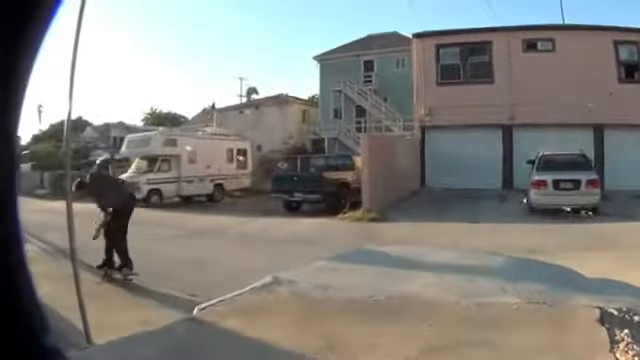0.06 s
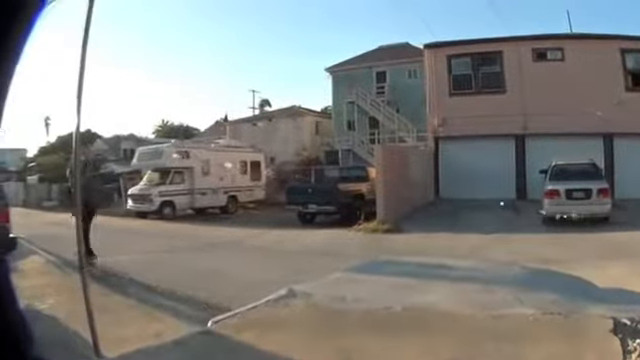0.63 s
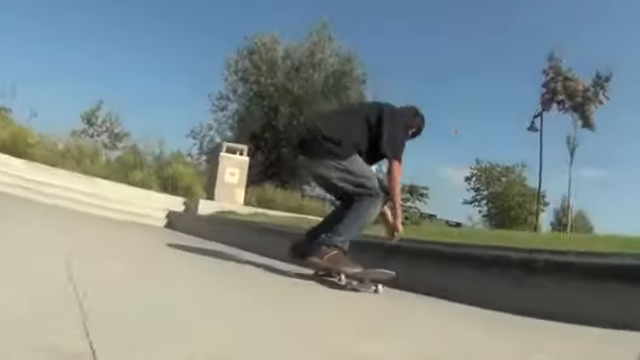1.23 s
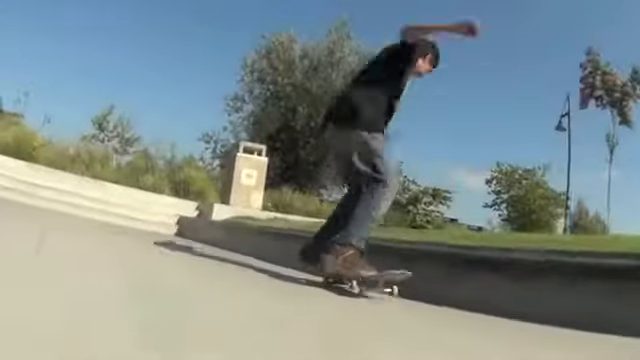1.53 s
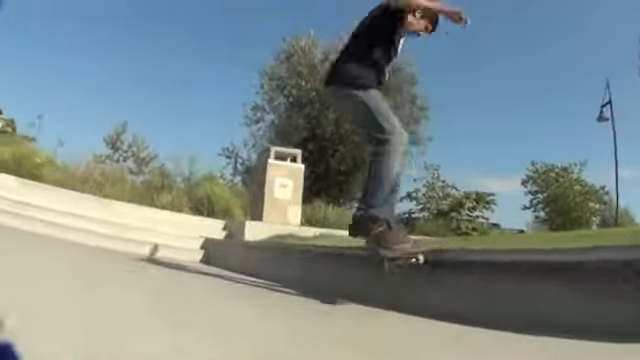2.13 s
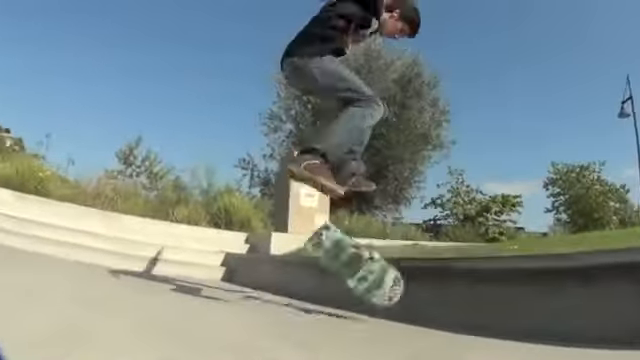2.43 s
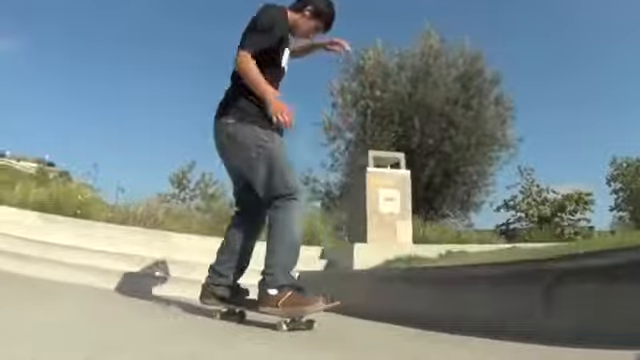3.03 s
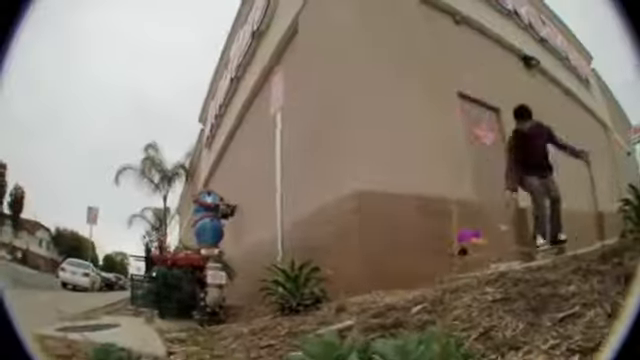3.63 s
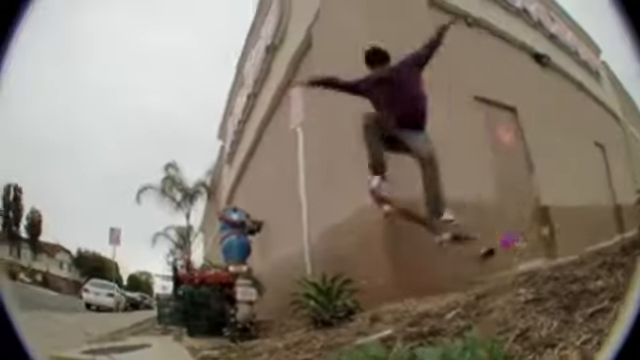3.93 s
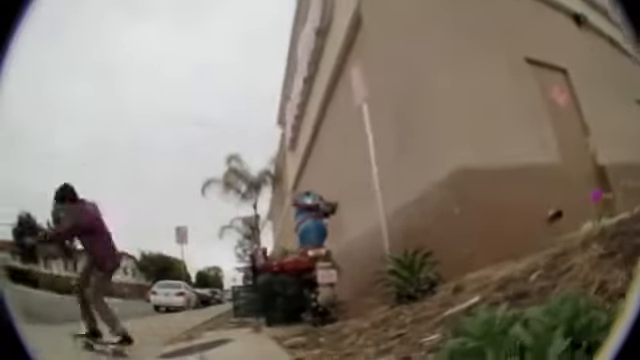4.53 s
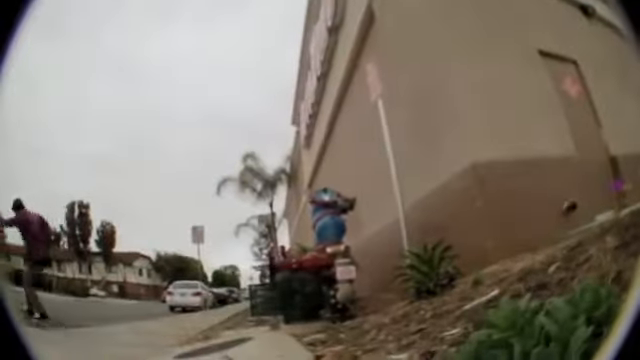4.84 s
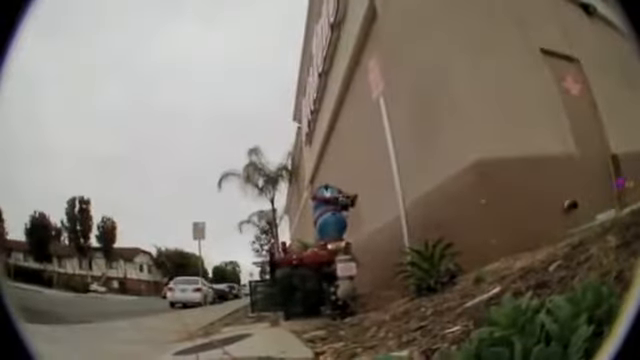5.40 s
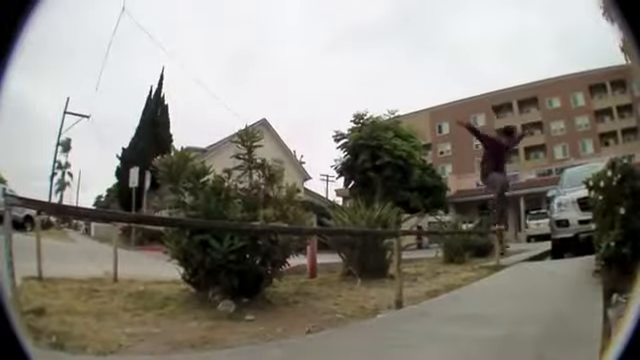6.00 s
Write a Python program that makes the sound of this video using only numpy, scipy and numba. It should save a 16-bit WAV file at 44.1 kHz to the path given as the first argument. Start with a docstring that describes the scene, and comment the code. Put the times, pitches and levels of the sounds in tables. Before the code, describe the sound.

A skateboard rolls over concrete outdoors, with sharp pops and clattering landings, then quieter rolling and single clacks over faint traffic.

```python
"""A skateboard rolls on concrete in four scenes: a push down an alley, a close ledge trick through a
limiter, an ollie over a gap beside a street, and one distant pop. Grains of the concrete drive wheels
and deck into random forced vibration; pops, landings and joints are impacts that excite the damped
modes of the maple deck. Friction makes the wheels sing, walls scatter a short reverberation,
gusts buffet the microphone and far traffic adds a steady wash."""
import sys
import numpy as np
from scipy import signal
from scipy.fft import rfft, irfft, next_fast_len
from scipy.io import wavfile
from scipy.ndimage import uniform_filter1d
from numba import njit

SR = 44100
rng = np.random.default_rng(int(sys.argv[2]) if len(sys.argv) > 2 else 0)


def generate_wav(sig):
    """Save sig (samples, or channels by samples) to the path in sys.argv[1] as 16-bit PCM at SR."""
    pcm = np.round(np.clip(np.atleast_2d(sig).T, -1, 1) * 32767).astype(np.int16)
    wavfile.write(sys.argv[1], SR, pcm)


N = 276066
T = np.arange(N) / SR
ALLEY_S, LEDGE_S, GAP_S, FAR_S = (-.2, .957), (.963, 3.497), (3.497, 5.722), (5.728, 6.5)  # start, end


def undb(db):
    """Decibels to amplitude ratio."""
    return 10 ** (np.asarray(db) / 20)


def unit(x):
    """Normalise to rms 1."""
    return x / np.sqrt(np.mean(x ** 2) + 1e-18)


def peak(x):
    """Normalise the crest of the envelope to about 1."""
    return x / np.sqrt(2 * uniform_filter1d(x ** 2, size=64).max())


def burst(x):
    """Normalise to the energy of 20 ms at rms 1."""
    return x / np.sqrt(np.sum(x ** 2) / (SR / 50))


def shape(x, gain):
    """Linear filtering: multiply the spectrum by gain(hz)."""
    size = next_fast_len(x.shape[-1])
    hz = np.maximum(np.arange(size // 2 + 1) * SR / size, 1)
    return irfft(rfft(x, size) * gain(hz), size)[..., :x.shape[-1]]


def colour(x, points):
    """Filter by (Hz, dB) points joined on a log axis."""
    f, db = np.transpose(points)
    return shape(x, lambda hz: undb(np.interp(np.log(hz), np.log(f), db)))


def resonance(hz, centre_hz, width_hz):
    """A Lorentzian peak of height 1."""
    return 1 / (1 + (2 * (hz - centre_hz) / width_hz) ** 2)


def walk(rate, size):
    """Random modulation with a spread near 1 and `rate` new values a second."""
    knots = rng.standard_normal(int(size / SR * rate) + 2)
    return np.interp(np.arange(size) / SR * rate, np.arange(len(knots)), knots)


def ramp(start_s, length_s):
    """Linear rise from 0 to 1."""
    return np.clip((T - start_s) / length_s, 0, 1)


def window(span, fade_in=.1, fade_out=.1):
    """Linear fades at both ends of a time span."""
    return ramp(span[0], fade_in) * np.clip((span[1] - T) / fade_out, 0, 1)


def bump(middle_s, half_s):
    """Gaussian swell to 1 and back."""
    return np.exp(-((T - middle_s) / half_s) ** 2)


def spread(mid, side, side_db):
    """Mid-side stereo: the sum goes left, the difference right."""
    return mid + undb(side_db) * side * np.array([[1], [-1]])


# Rough patches. Each row: middle in seconds, half length in seconds, rise of the grit in dB.
ROUGHNESS = [(0.037, 0.06, 5.5), (0.202, 0.012, 4.5), (.57, 0.021, 5), (0.736, 0.009, 8),
             (0.843, 0.045, 10), (1.124, .04, 2), (1.33, 0.036, 2), (2.95, 0.023, 4.5), (3.067, 0.069, 3.5),
             (3.213, 0.1, 4.5), (3.905, 0.022, 13)]
# The rider's shifting weight. Each row: middle in seconds, half length in seconds, rumble change in dB.
WHEEL_LOADS = [(0.558, 0.073, 4.5), (1.765, 0.037, -9), (2.349, 0.028, 6), (2.516, 0.046, -7),
               (3.11, 0.017, 5.5), (3.353, 0.011, 8.5), (3.582, .012, 14), (4.573, 0.055, 14),
               (5.17, 0.098, 10)]


def drive(base_db, change_db, rumble_slope, grit_slope):
    """Excitation in dB: load adds rumble; roughness adds grit, and about half as much roar."""
    rough = sum(db * bump(s, half_s) for s, half_s, db in ROUGHNESS)
    load = sum(db * bump(s, half_s) for s, half_s, db in WHEEL_LOADS)
    roar = base_db + change_db + 0.49 * rough
    rumble = base_db + rumble_slope * change_db + load
    grit = base_db + grit_slope * change_db + rough
    return roar, rumble, grit


def patchy(x, depth_db, rate, count=24):
    """Amplitude modulation: each band swells and fades by itself as the wheels meet new ground."""
    centres = np.linspace(np.log(100), np.log(16000), count)
    bands = (shape(x, lambda hz: np.interp(np.log(hz), centres, weight)) for weight in np.eye(count))
    return sum(band * undb(depth_db * walk(rate, x.shape[-1])) for band in bands)


def rolling(span, levels, tone, board, ring, grain_db, flutter_db, side_db):
    """Forced vibration: thousands of grain impacts a second shake the board through its resonances."""
    inside = (T >= span[0]) & (T < span[1])
    size, out = inside.sum(), np.zeros((2, N))
    roar, rumble, grit = (db[inside] for db in levels)
    grains = rng.standard_normal((2, size))
    grains *= undb(grain_db * np.minimum(rng.exponential(size=size), 5) + flutter_db * walk(70, size))
    response = lambda hz: 1 + ring * sum(undb(db / 4) * resonance(hz, f, w) for f, w, db in board)
    shaken = patchy(shape(colour(grains, tone), response), depth_db=2.5, rate=20)
    below = lambda hz, edge_hz: 1 / (1 + (hz / edge_hz) ** 6)
    # the rider's weight rumbles, the deck roars, the contact patches hiss
    parts = [(lambda hz: below(hz, 403), rumble, side_db - 4.5),
             (lambda hz: below(hz, 1780) - below(hz, 442), roar, side_db),
             (lambda hz: 1 - below(hz, 2090), grit, side_db + 0.5)]
    for band, db, width_db in parts:
        out[:, inside] += spread(*unit(shape(shaken, band)), width_db) * undb(db)
    return out


def lean(x, balance):
    """Level difference between channels: each microphone port has its own frequency response."""
    return np.array([colour(channel, np.array(balance) * [1, share])
                     for channel, share in zip(x, (.5, -.5))])


# Rolling spectrum of coarse concrete. Each row: frequency in Hz, gain in dB.
ALLEY_SPECTRUM = [(21, -60), (35, -26.5), (135, -2), (306, -3.5), (365, -1), (727, -8.5), (987, -6),
                  (1640, -12.5), (1820, -9.5), (2120, -11.5), (5050, -18), (6680, -16.5), (13600, -22),
                  (15500, -27.5)]
# Resonances of the loaded board. Each row: frequency in Hz, width in Hz, weight in quarter dB.
ALLEY_RESONANCES = [(365, 410, -2), (1140, 160, -38), (1824, 31, -1), (2860, 76, -12), (4180, 480, -13),
                    (6600, 82, -19)]
# Stereo balance. Each row: frequency in Hz, left minus right in dB.
ALLEY_BALANCE = [(60, 4), (110, -1.5), (200, 2), (380, 2.5), (700, 7), (1290, 5.5), (2380, 1.5), (4400, 3),
                 (8120, 8.5), (15000, 8.5)]


def alley():
    """Inverse-square law: the board passes close on the left; then the rider's body screens the grit."""
    pass_s, half_power_s = 0.48, 0.32
    nearness_db = -10 * np.log10(1 + ((T - pass_s) / half_power_s) ** 2)
    roar, rumble, grit = drive(-24, nearness_db, rumble_slope=0.71, grit_slope=1.0)
    screening_db = -8 * ramp(pass_s, 0.11)
    levels = roar - 2, rumble - 1.3, grit - 3 + screening_db
    wheels = rolling(ALLEY_S, levels, ALLEY_SPECTRUM, ALLEY_RESONANCES,
                     ring=0.99, grain_db=4, flutter_db=1.5, side_db=-8.5)
    blows = undb(-7.5) * impacts(ALLEY_S, weight_db=-20)
    return lean(wheels + blows, ALLEY_BALANCE) * window(ALLEY_S, fade_out=0.049)


# Clacks of wheels and trucks. Each row: start in seconds, ring level in dB, ring centre in Hz,
# crack level in dB. Levels in these three tables are relative.
CLACKS = [(.195, -6.5, 1180, -18.5), (.333, -1.5, 1030, -16), (.542, -14, 830, -39), (0.812, -8, 649, -27),
          (1.402, 6, 1010, -38), (1.445, -1.5, 1090, -21), (1.7, -10.5, 800, -23), (2.392, -21, 735, -26),
          (2.642, -2.5, 950, -12), (2.685, 1, 710, -15.5), (2.701, -3, 694, -14), (2.73, -3.5, 684, -15.5),
          (2.767, -1, 1100, -22), (3.026, -9, 1610, -24), (3.345, -11, 800, -28.5), (3.57, -26, 875, -42),
          (4.476, -1, 1340, -16), (4.485, -2.5, 910, -31), (4.512, -5.5, 970, -23.5),
          (4.567, -31, 974, -31.5), (4.967, -24, 1650, -43), (5.126, -15, 1060, -39), (5.2, -26, 1000, -43),
          (5.998, -17.5, 1040, -46.5)]
# Pavement joints. Each row: start in seconds, rear axle lag in seconds, ring level in dB,
# ring centre in Hz, crack level in dB, thud level in dB.
PAVEMENT_JOINTS = [(2.051, 0.061, -21, 1400, -17.5, -32), (3.729, 0.07, -15.5, 1130, -38.5, -36.5),
                   (4.597, .069, -12, 970, -30.5, -35.5), (4.949, .144, -8.5, 1010, -35.5, -48)]
# Pops and hard landings. Each row: start in seconds, slap level in dB, slap pitch as a ratio,
# ring level in dB, ring centre in Hz, thud level in dB, contact time in seconds.
BOARD_SLAPS = [(1.232, -16, .6, 1, 900, -30, .02), (1.39, -9, .5, 7, 1060, -18, .02),
               (1.753, -4, 1.15, -2, 1420, -36, .009), (2.016, -10, 1.2, 2, 1220, -32, .01),
               (2.622, -1, .6, 4, 1500, -24, .018), (2.751, -7, 1.4, 4, 1150, -24, .012),
               (3.9234, -3.5, 1.0, -12, 2100, -47, .0035), (4.4744, -9, 1.8, -9, 1300, -34, .003),
               (6.0957, -6, .85, -7, 1480, -48, .0024)]


def impacts(span, weight_db):
    """Superposition of the blows in a span; a clack's thud level is its ring level plus weight_db."""
    blows = [(s, knock, (db, hz, crack, db + weight_db)) for s, db, hz, crack in CLACKS]
    for s, lag_s, db, hz, crack, thud in PAVEMENT_JOINTS:
        for axle_s in (s, s + lag_s):
            for skew_s, drop_db in ((0, 0), (.009, -0.5)):  # an axle's two wheels meet the joint askew
                blows.append((axle_s + skew_s, knock, (db + drop_db, hz, crack + drop_db, thud + drop_db)))
    blows += [(s, pop, settings) for s, *settings in BOARD_SLAPS]
    out = np.zeros(N + SR)
    for s, strike, settings in blows:
        if span[0] < s < span[1]:
            sound, start = strike(*settings), int(s * SR)
            out[start:start + len(sound)] += sound
    return out[:N]


# Modes of deck and trucks. Each row: frequency in Hz, relative level in dB, 60 dB decay time in seconds.
DECK_MODES = [(482, -9.5, 0.14), (608, -14, 0.044), (692, 3.5, 0.047), (940, 10.5, 0.022),
              (1123, 8.5, 0.021), (1278, -3.5, 0.039), (1417, 4, 0.021), (1820, -2, 0.069),
              (2064, -10.5, 0.064), (2230, -1.5, 0.016), (2760, -15, 0.012), (3000, 3, 0.038),
              (3250, -9, 0.042), (4080, -11, .025), (4740, -7, .025), (5200, 2, .02)]
# Spectra of hard contact and of the rider's weight. Each row: frequency in Hz, gain in dB.
CRACK_SPECTRUM = [(300, -56), (1200, 14), (3000, 2.5), (5500, -0.5), (7200, -5), (8800, -0.5), (11000, -9),
                  (15500, -18.5)]
THUD_SPECTRUM = [(40, -50.5), (120, -3), (250, -2), (450, 7.5), (800, -11.5), (2000, -29.5)]


def knock(ring_db, centre_hz, crack_db, thud_db, contact_s=0.0065, crunch=0.36, focus=2.2):
    """Impulse response: damped modes near centre_hz ring, the contact cracks and the weight thuds."""
    t = np.arange(SR // 5) / SR
    noise = rng.standard_normal((3, len(t)))
    press = (1 - np.exp(-t / 0.0002)) * np.exp(-t / contact_s)
    near = lambda hz: np.exp(-focus * np.log2(hz / centre_hz) ** 2 / 2)
    deck = np.zeros(len(t))
    for hz, db, t60 in DECK_MODES:
        envelope = near(hz) * undb(db + rng.normal(0, 1.3) - 60 * t / t60)
        deck += envelope * np.sin(2 * np.pi * (hz * rng.normal(1, 0.0057) * t + rng.random()))
    grinding = shape(noise[0], near) * np.sqrt(press) * np.exp(-t / 0.038)
    ring = peak(deck * (1 - np.exp(-2 * t / contact_s))) + crunch * peak(grinding)
    crack = colour(noise[1], CRACK_SPECTRUM) * (press + 0.05 * np.exp(-t / 0.019))
    thud = colour(noise[2], THUD_SPECTRUM) * (1 - np.exp(-t / 0.0033)) * np.exp(-t / 0.015)
    return 0.54 * peak(ring) * undb(ring_db) + burst(crack) * undb(crack_db) + burst(thud) * undb(thud_db)


# Wheels that scrub or spin. Each row: start and end in seconds, centre and width in Hz, level in dB.
WHEEL_WHINES = [(0.353, .88, 1865, 90, -37.5), (1.134, 1.153, 6500, 700, -21.5),
                (1.455, 1.63, 2960, 220, -24.5), (1.76, 1.884, 3250, 1200, -24.5),
                (2.063, 2.12, 9500, 5000, -25.5), (4.09, 4.32, 4300, 252, -56.5),
                (4.78, 5.067, 6400, 200, -60)]


def whines():
    """Frictional excitation sustains one wheel resonance for a moment, in fits and starts."""
    out = np.zeros(N)
    for start, end, centre_hz, width_hz, db in WHEEL_WHINES:
        inside = (T > start) & (T < end)
        tone = shape(rng.standard_normal(N)[inside], lambda hz: resonance(hz, centre_hz, width_hz))
        fitful = unit(tone * undb(4.5 * walk(90, len(tone))))
        out[inside] += fitful * signal.windows.tukey(len(tone), .5) * undb(db)
    return out


# Rolling spectrum of smooth concrete. Each row: frequency in Hz, gain in dB.
LEDGE_SPECTRUM = [(53, -43), (90, -16.5), (151, -5), (424, -6.5), (550, 1.5), (639, -1.5), (743, 4),
                  (810, -2), (1120, -1.5), (1760, -3.5), (2050, -9.5), (2890, -12.5), (3990, -14),
                  (6270, -14.5), (15500, -31)]
# Resonances of the loaded board. Each row: frequency in Hz, width in Hz, weight in quarter dB.
LEDGE_RESONANCES = [(163, 38, -16), (568, 95, -8), (2970, 570, -2)]
# Stereo balance. Each row: frequency in Hz, left minus right in dB.
LEDGE_BALANCE = [(60, -18), (110, 0), (200, 1.5), (380, 1), (700, 3.5), (1290, 1.5), (2380, 1.5),
                 (4400, -2), (8120, -2.0), (15000, 1.5)]


def ledge():
    """Rolling noise falls with speed: the board slows through a ledge trick, and more on landing."""
    slowing_db = -1.9 * (T - LEDGE_S[0]) - 5.5 * ramp(2.8, 0.037)
    roar, rumble, grit = drive(-21, slowing_db, rumble_slope=1.36, grit_slope=0.87)
    clatter_db = 4 * window((2.635, 2.81), fade_in=0.027, fade_out=0.022)  # the deck shakes as it settles
    levels = roar - 0.3 + clatter_db, rumble - 0.5, grit + 2
    wheels = rolling(LEDGE_S, levels, LEDGE_SPECTRUM, LEDGE_RESONANCES,
                     ring=0.55, grain_db=1.4, flutter_db=1.5, side_db=-11.5)
    blows = outdoors(impacts(LEDGE_S, weight_db=-18.5), wet_db=-7.5, t60=0.19) * undb(-1.5)
    heard = lean(wheels + blows, LEDGE_BALANCE) + wind()
    limited = limiter(heard, top_db=-8.5, attack_s=0.00085, release_s=0.055)
    return limited * window(LEDGE_S, fade_in=0.088, fade_out=0.089)


# Gusts over a light breeze. Each row: middle in seconds, level in dB.
WIND_GUSTS = [(1.21, -37), (1.45, -41), (1.89, -38.5), (2.6, -41), (2.8, -36)]


def wind(breeze_db=-49, gust_s=0.049):
    """Turbulent pressure buffets the two microphone ports, only partly correlated between them."""
    spectrum = [(12, -19), (25, -7), (60, 5), (100, -5), (220, -40)]
    buffets = unit(colour(rng.standard_normal((2, N)), spectrum))
    strength = undb(breeze_db) + sum(undb(db) * bump(s, gust_s) for s, db in WIND_GUSTS)
    return spread(*buffets, side_db=-5) * strength


# Spectrum of the board slapping the ground. Each row: frequency in Hz at pitch 1, gain in dB.
SLAP_SPECTRUM = [(400, -29), (800, -16), (1070, -1), (1600, -4.5), (2000, -6), (2600, -4), (3200, 3),
                 (3700, -8.5), (4200, -2.5), (5400, -12), (7000, -17), (15000, -33), (19000, -52)]


def pop(slap_db, pitch, ring_db, centre_hz, thud_db, contact_s, flat_s=.0035, flat_db=6):
    """Double impact: one edge touches, the board slaps flat a moment later, and the deck rings."""
    ring = knock(ring_db, centre_hz, -np.inf, thud_db, contact_s, crunch=0.17, focus=21)
    t = np.arange(len(ring)) / SR
    edge = np.exp(-t / contact_s)
    flat = np.clip((t - flat_s) / 0.00026 + 1, 0, 1) * np.exp(-np.abs(t - flat_s) / contact_s)
    envelope = (edge + undb(flat_db) * flat + .05 * np.exp(-t / 0.022)) * (1 - np.exp(-t / 0.00057))
    slap = colour(rng.standard_normal(len(t)), np.array(SLAP_SPECTRUM) * [pitch, 1]) * envelope
    crest = np.sqrt(2 * np.sum(slap ** 2) / (SR * contact_s))
    return ring + slap / crest * undb(slap_db)


def outdoors(x, wet_db, t60):
    """Reverberation: walls and parked cars scatter a thin tail whose treble dies first."""
    t = np.arange(SR // 2) / SR
    scatter = colour(rng.standard_normal(len(t)), [(150, -12.5), (1000, -1), (4000, -3), (14000, -1)])
    dull = shape(scatter, lambda hz: 1 / (1 + (hz / 2000) ** 4))
    tail = dull * undb(-60 * t / t60) + (scatter - dull) * undb(-60 * t / (.75 * t60))
    tail *= np.minimum(t / 0.0087, 1)
    return x + undb(wet_db) * signal.fftconvolve(x, tail / np.linalg.norm(tail))[:N]


@njit
def follow(x, attack, release):
    """Envelope detection with separate rates of rise and fall."""
    out, level = np.empty(len(x)), 0.
    for i in range(len(x)):
        level += (x[i] - level) * (attack if x[i] > level else release)
        out[i] = level
    return out


def limiter(x, top_db, attack_s, release_s):
    """Gain reduction lags: a blow's first crack gets through, then the rolling hiss ducks behind it."""
    envelope = follow(np.abs(x).max(axis=0), 1 / (1 + attack_s * SR), 1 / (1 + release_s * SR))
    gain = np.minimum(1, undb(top_db) / (envelope + 1e-9))
    return .9 * np.tanh(x * gain / .9)


def traffic(tone, db):
    """Incoherent sources on far roads sum to a steady wash that wavers a little."""
    return unit(colour(rng.standard_normal(N), tone)) * undb(db + 0.18 * walk(3.7, N))


# Rolling spectrum of the pavement, then spectrum of far traffic. Each row: frequency in Hz, gain in dB.
GAP_SPECTRUM = [(35, -86), (60, -62.5), (381, -20), (418, -12), (619, -8), (679, -6.5), (855, -4.5),
                (1010, -5.5), (1560, -11), (1830, -14), (3420, -28.5), (4730, -27.5), (6090, -34.5),
                (8420, -29.5), (15000, -47)]
GAP_TRAFFIC = [(29, -58), (50, -29), (140, -17), (186, -10.5), (272, -7.5), (816, 2), (898, 0.5),
               (1520, -1), (3580, -19), (4340, -21), (5910, -23), (15000, -34.5)]
# Resonances of the loaded board. Each row: frequency in Hz, width in Hz, weight in quarter dB.
GAP_RESONANCES = [(720, 89, -11), (1020, 100, 12), (1270, 34, -3), (1780, 79, -7), (3700, 110, -22.5),
                  (6550, 140, -18), (8300, 600, -19)]


def gap(take_off_s=3.93, touch_down_s=4.48, kerb_s=5.084):
    """Rolling noise needs contact: it stops during the ollie and surges as landing shakes the board."""
    base_db = np.where(T < take_off_s, -42, -41)
    shake_db = 15.5 * np.exp(-np.abs(T - touch_down_s) / 0.18) * (T > take_off_s)
    coarse_db = 13 * ramp(kerb_s, 0.36)  # the street beyond the kerb is coarser
    roar, rumble, grit = drive(base_db, shake_db + coarse_db, rumble_slope=0.83, grit_slope=0.63)
    levels = roar - 0.5, rumble - 12, grit - 11.5 + 2 * ramp(kerb_s, 0.022)
    wheels = rolling(GAP_S, levels, GAP_SPECTRUM, GAP_RESONANCES,
                     ring=0.78, grain_db=4, flutter_db=2.5, side_db=-np.inf)  # mono
    on_ground = ramp(3.565, .01) - window((take_off_s, touch_down_s), fade_in=.04, fade_out=0.0089)
    street = engine() + traffic(GAP_TRAFFIC, -36.5) * undb(-3.8 * ramp(4.43, 1.0))
    blows = outdoors(impacts(GAP_S, weight_db=-35.5), wet_db=-14, t60=0.51)
    blows = small_microphone(blows, ceiling=0.84, low_cut_hz=175)
    return (wheels * on_ground + blows + street) * window(GAP_S, fade_in=0.081, fade_out=0.099)


def small_microphone(x, ceiling, low_cut_hz):
    """Saturation rounds the tips of the loudest blows; a high-pass response thins the bass."""
    rounded = x / (1 + (x / ceiling) ** 6) ** (1 / 6)
    return signal.sosfilt(signal.butter(3, low_cut_hz, "high", fs=SR, output="sos"), rounded)


def engine():
    """A far engine hums as one tone under slight frequency modulation."""
    hz = 195 + 1.4 * walk(2.77, N)
    hum = np.sin(2 * np.pi * np.cumsum(hz) / SR)
    return hum * undb(-52) * window((3.6, 4.8), fade_in=0.49, fade_out=0.46)


# Spectrum of traffic in a quiet street. Each row: frequency in Hz, gain in dB.
QUIET_TRAFFIC = [(29, -62), (50, -33), (329, -12.5), (428, -18), (494, -3), (570, -11), (987, -1),
                 (1380, -10), (1520, -11), (3420, -24), (13600, -38.5), (15000, -40)]


def far_pop():
    """Two transients over ambient noise: a faint clack, then the board's tail snapping down."""
    blows = outdoors(impacts(FAR_S, weight_db=-45), wet_db=-14.5, t60=0.33)
    blows = small_microphone(blows, ceiling=0.82, low_cut_hz=400)
    return (traffic(QUIET_TRAFFIC, -47.5) + blows) * window(FAR_S, fade_in=0.11)


def scene():
    """The four scenes in turn, with the wheel whines superposed."""
    return alley() + ledge() + gap() + far_pop() + whines()


def record(dry):
    """Hard clipping just below full scale, then band limiting at 15.9 kHz."""
    low_pass = signal.ellip(10, .2, 80, 15900, fs=SR, output="sos")
    return signal.sosfilt(low_pass, np.clip(dry, -.97, .97))


dry = scene()
out = record(dry)
generate_wav(out)
```